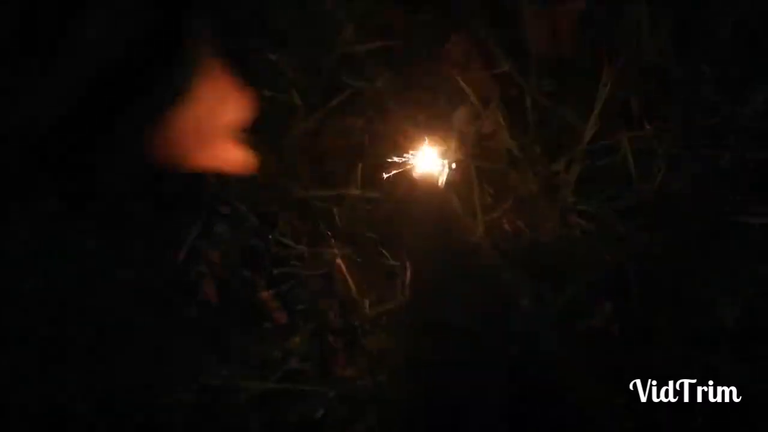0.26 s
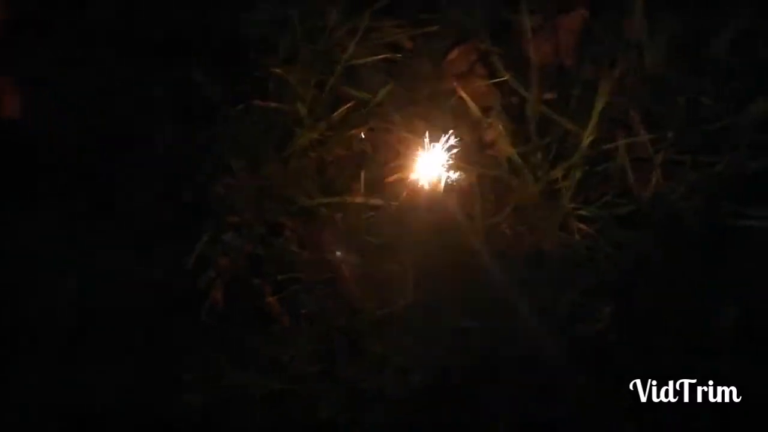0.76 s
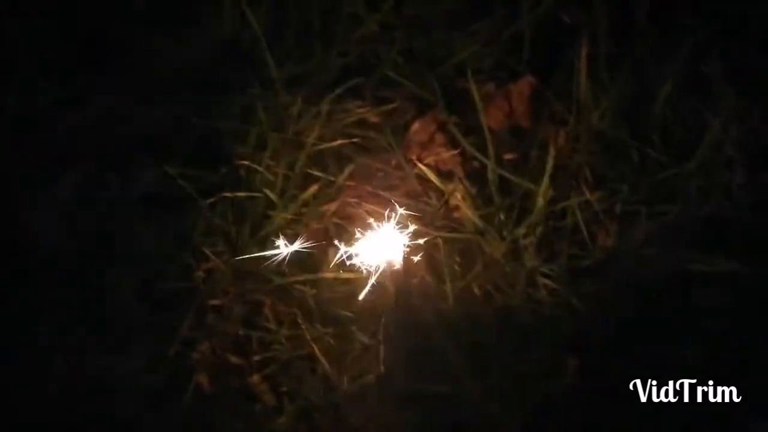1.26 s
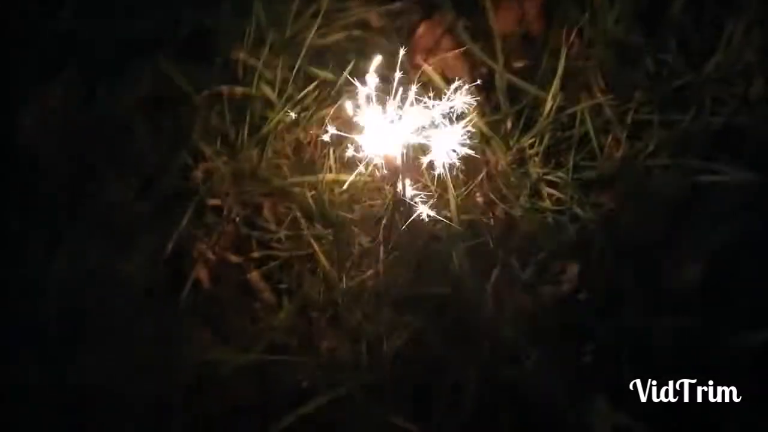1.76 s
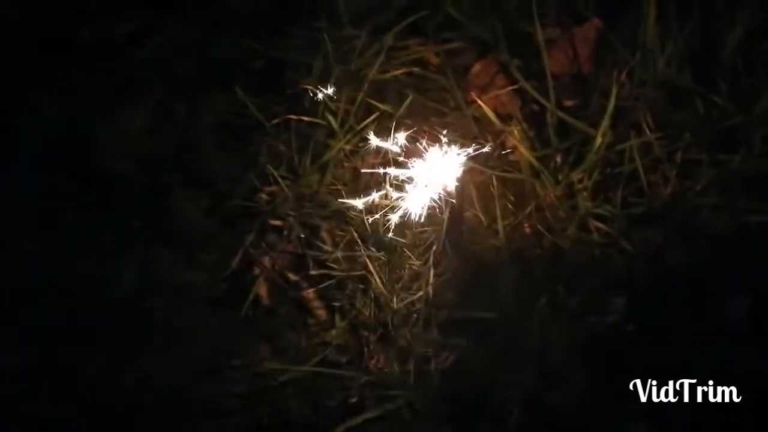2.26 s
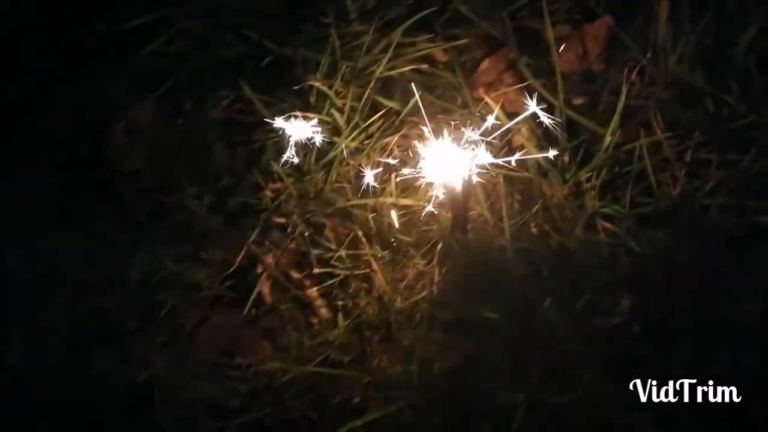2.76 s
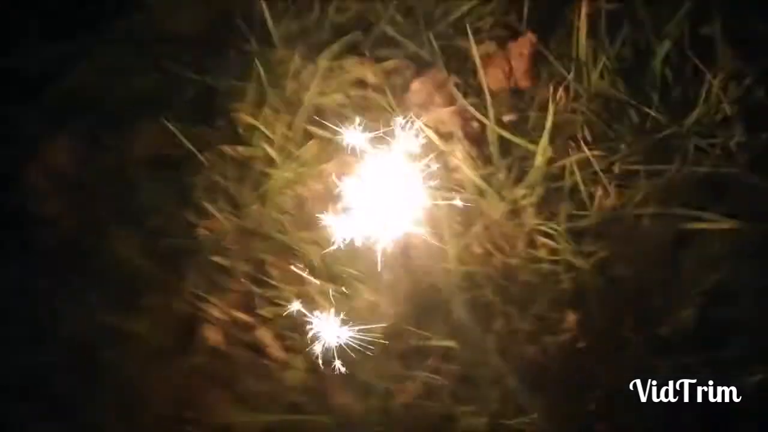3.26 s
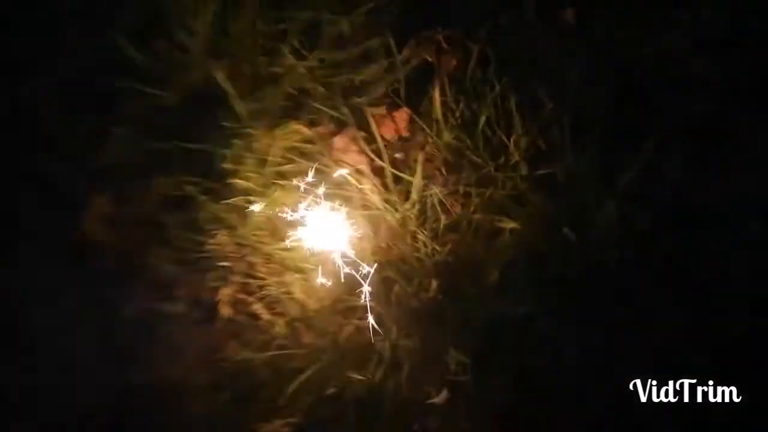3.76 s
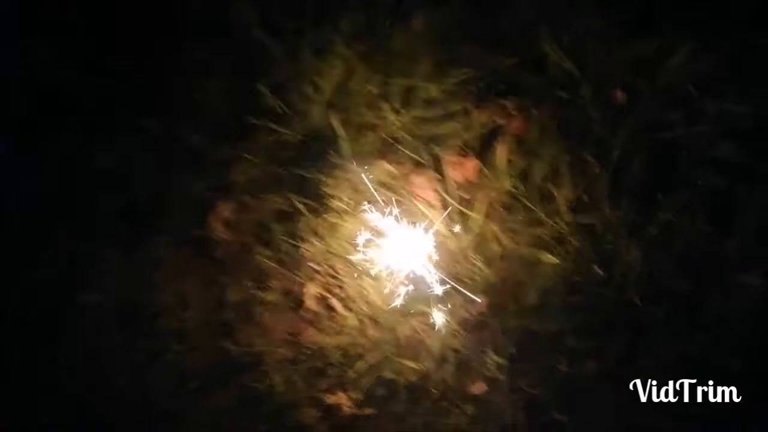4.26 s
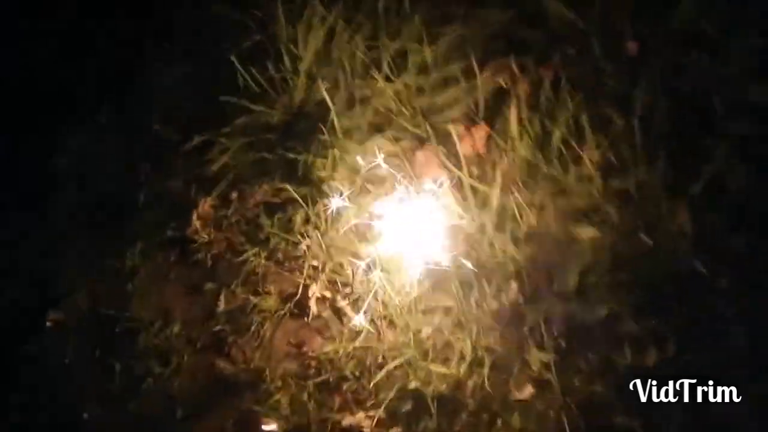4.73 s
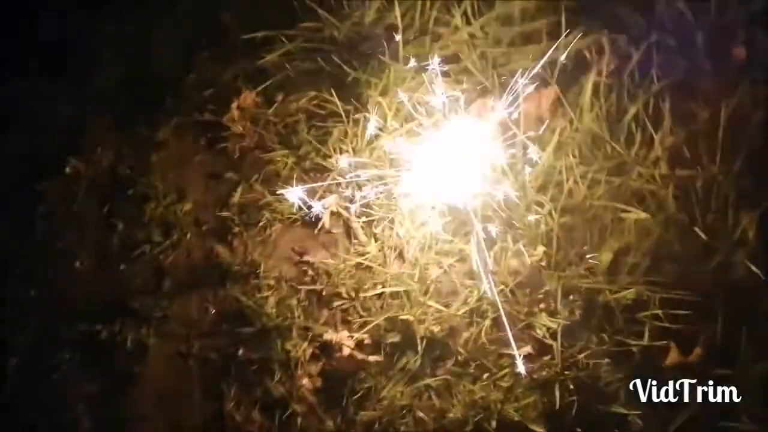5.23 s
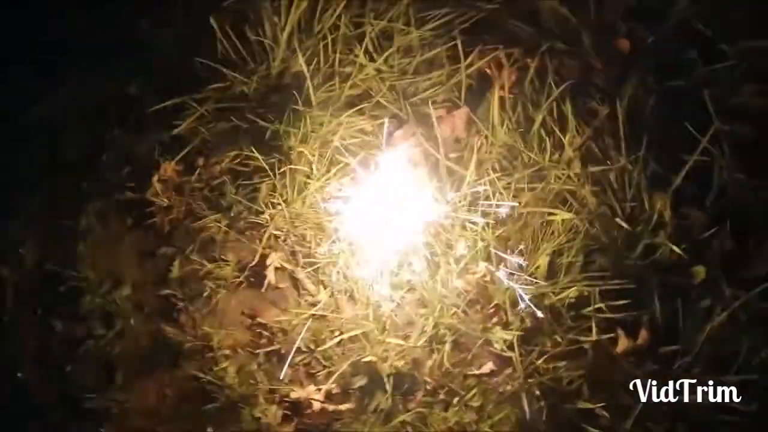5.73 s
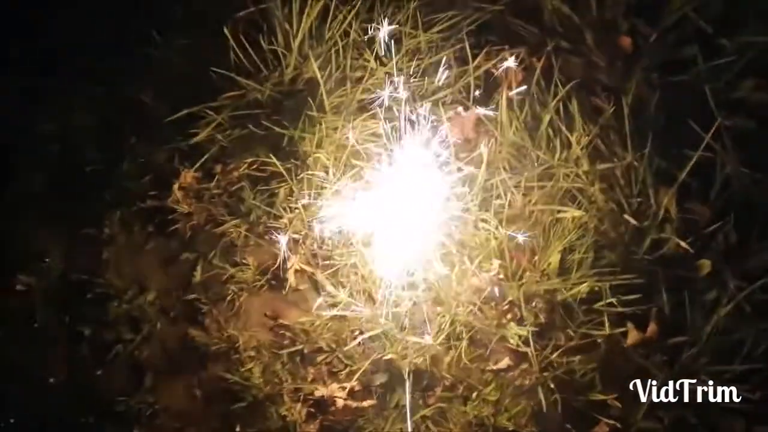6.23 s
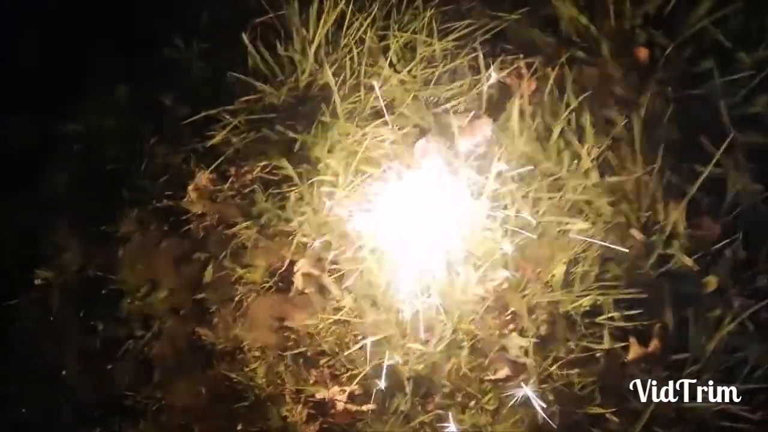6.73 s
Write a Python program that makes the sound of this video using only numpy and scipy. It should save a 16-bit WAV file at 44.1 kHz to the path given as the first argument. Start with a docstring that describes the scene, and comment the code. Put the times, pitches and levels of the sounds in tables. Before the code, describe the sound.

A bundle of sparklers fizzes with a bright, flickering hiss and sharp spark pops outdoors at night, while a brief sleeve swish passes over faint traffic rumble.

```python
"""A bundle of sparklers burns in the grass at night, close to a hand-held phone with two microphones.
From the start the burning coat hisses (flickering filtered noise) over a far traffic rumble (low noise).
Soon sparks begin to pop (filtered clicks with an echo), then a sleeve swishes away on the left (soft noise).
A few dull bumps follow (short low sines), and later jets of gas rush (noise around one pitch)."""
import sys
import numpy as np
from scipy import signal
from scipy.io import wavfile
from scipy.ndimage import uniform_filter1d

SR = 44100
rng = np.random.default_rng(int(sys.argv[2]) if len(sys.argv) > 2 else 0)


def wav_record(signal):
    """Record a signal, one row per channel, as 16-bit PCM in the file named by sys.argv[1]."""
    frames = np.transpose(np.atleast_2d(signal))
    bounded = np.clip(frames, -1, 1)
    # unit amplitude maps onto the largest positive 16-bit level
    quanta = np.round(bounded * 32767).astype(np.int16)
    wavfile.write(sys.argv[1], SR, quanta)


N = 308347  # length in samples


def gain_of(db):
    """Amplitude factor for a level in dB."""
    return 10 ** (np.asarray(db) / 20)


def evened(x):
    """Scale to rms 1."""
    return x / np.sqrt(np.mean(x ** 2) + 1e-20)


def read_curve(points, hz):
    """Read a frequency curve, straight between its points on a log frequency axis."""
    point_hz, value = np.transpose(points)
    return np.interp(np.log(hz + 1), np.log(point_hz + 1), value)


def follow(rows, t):
    """Ride every column of a table along its time column."""
    time_s, *columns = np.transpose(rows)
    return [np.interp(t, time_s, column) for column in columns]


def humps(rows, t):
    """Sum of rounded rises and falls in dB."""
    return sum(db * np.exp(-2 * ((t - peak_s) / half_s) ** 2) for peak_s, db, half_s in rows)


def grid(size):
    """Bin frequencies in Hz as a column and frame times in s as a row."""
    hz = np.fft.rfftfreq(size, 1 / SR)
    frame_s = np.arange(4 * N // size + 5) * size / 4 / SR
    return hz[:, None], frame_s[None]


def drift(shape, bins, frames):
    """Random patches of rms 1, smooth over some bins and frames."""
    x = rng.standard_normal(shape[::-1]).T
    smooth_in_pitch = uniform_filter1d(x, bins, 0)
    return evened(uniform_filter1d(smooth_in_pitch, frames, 1))


def noise_pair(size, left, right, same, lead_s, field_db):
    """Noise from random short-time spectra: partly alike in both microphones, later in the right by lead_s."""
    hz, t = grid(size)
    a, b, c, d = rng.standard_normal((t.size, hz.size, 4)).T
    likeness = np.clip(read_curve(same, hz), -1, 1)
    first = a + 1j * b
    shared = likeness * first * np.exp(-2j * np.pi * hz * lead_s)
    second = shared + np.sqrt(1 - likeness ** 2) * (c + 1j * d)
    spectra = np.array([first * gain_of(read_curve(left, hz)), second * gain_of(read_curve(right, hz))])
    # before the field moves the level, the mid of the pair sets the reference: rms 1
    plain_mid = signal.istft(spectra.mean(0), nperseg=size, noverlap=3 * size // 4)[1]
    pair = signal.istft(spectra * gain_of(field_db), nperseg=size, noverlap=3 * size // 4)[1]
    return pair[:, :N] / plain_mid.std()


def sputter(per_s, spread_db, decay_s):
    """Sudden flares that die away exponentially: a gain, never under 1."""
    lift = gain_of(spread_db * np.minimum(rng.exponential(1, N), 2.4))
    strikes = lift * (rng.random(N) < per_s / SR)
    decay = np.exp(-np.arange(2000) / SR / decay_s)
    return 1 + signal.oaconvolve(strikes, decay)[:N]


# strength of the fire: [t/s, level/dB]
FIRE_STRENGTH = [(0, -50.5), (.11, -47.5), (.27, -54), (.42, -46.5), (.68, -47.5), (1.42, -49.5),
                 (1.63, -51), (1.82, -49.5), (1.88, -56), (1.93, -51), (2.25, -50), (2.56, -55),
                 (2.74, -49.5), (3.1, -48.5), (3.3, -46), (3.61, -46.5), (3.91, -50.5), (4.2, -47),
                 (5.47, -46.5), (5.58, -51), (5.72, -46), (5.84, -49.5), (5.95, -45), (6.05, -49.5),
                 (6.2, -47), (7, -46)]
# brief flare-ups of the hiss: [peak t/s, lift level/dB, half length t/s]
FLARE_UPS = [(.332, 5.5, 0.041), (1.722, 4, 0.098), (2.139, 2, 0.026), (2.306, 3.5, .035),
             (2.476, 3.5, 0.025), (2.92, 2, 0.089), (3.36, 3.5, 0.025), (4.704, 1, 0.042),
             (5.285, 3, 0.086), (6.141, 4, .07)]
# the flame's roar under the hiss: [t/s, level/dB]
ROAR_SWELL = [(.6, -3.5), (1.5, -0.5), (2.7, 3), (3.4, 0), (4.0, 2), (4.4, -1.5), (4.9, 3), (5.5, 3.5),
              (6.2, 3.5)]
# colour change, fading in as the fire spreads: [f/Hz, left level/dB, right level/dB]
SPREAD_COLOUR = [(730, -0.5, 0), (1620, 5, -4.5), (2300, 1, 1), (2750, 1.5, -3), (3700, 2, -8.5),
                 (4500, 2, -2), (5270, 1.5, 0.5), (6200, 0.5, -2.5), (8400, 3.5, -0.5), (11200, 2, 2),
                 (13800, 5, 2)]
# each microphone's view of the fire, ground echo dip and port resonance included: [f/Hz, level/dB per Hz]
LEFT_VIEW = [(300, -12), (700, -18), (1400, -10), (2000, -17), (3000, -14.5), (4000, -15), (5500, -13.5),
             (6600, -13), (8600, -7.5), (10000, -11), (11200, -17), (12600, -21.5), (15800, -27.5)]
RIGHT_VIEW = [(300, -12), (700, -18), (1400, -4.5), (2100, -8.5), (2900, -9), (3400, -3.5), (3800, 3),
              (4400, -10.5), (5500, -10.5), (6300, -3.5), (7700, 0.5), (9000, -7), (10700, -21.5),
              (11900, -16), (15800, -24)]
# how alike the fire sounds in both microphones: [f/Hz, likeness from 0 to 1]
FIRE_LIKENESS = [(300, 0.59), (700, 0.038), (1300, 1), (2000, 0.12), (3000, 0.64), (4500, 0.052),
                 (7500, 0.25), (9500, 0.033)]
FIRE_LEAD_S = .00005  # the left microphone hears the fire earlier
SPREAD_S = 7.1  # time the fire takes to spread over the bundle
PAN_START_DB, PAN_DB_PER_S = 1.5, -0.6  # left-right balance drifts as it spreads


def fire():
    """Hiss of burning metal powder: it throbs as a whole, drifts in patches and spits tiny sparks."""
    hz, t = grid(size=256)
    hiss_db = follow(FIRE_STRENGTH, t)[0] + humps(FLARE_UPS, t)
    slow_db = uniform_filter1d(hiss_db, 300, 1)
    roar_db, = follow(ROAR_SWELL, t)
    spread = t / SPREAD_S
    pan_db = PAN_START_DB + PAN_DB_PER_S * t
    low = 1 / (1 + (hz / 2800) ** 2)  # the flame's roar swells apart from the hiss
    top = 1 / (1 + (11000 / (hz + 1)) ** 6)
    # the roar and the far treble, which come from the whole fire, throb less than the hiss
    steady = np.clip(0.25 * low + 0.17 * top, 0, 1)
    throb_db = hiss_db - slow_db + 0.87 * drift((1, t.size), bins=1, frames=6)
    mean_db = slow_db + low * roar_db
    throb_depth = (.7, 1.)  # the left microphone faces away and hears a more blended fire
    field_db = []
    for k in range(2):
        patches_db = 1.82 * drift((hz.size, t.size), bins=5, frames=22)
        colour_db = read_curve([(row[0], row[1 + k]) for row in SPREAD_COLOUR], hz)
        moving_db = throb_depth[k] * (1 - steady) * throb_db + patches_db
        field_db.append(mean_db + moving_db + pan_db * (.5 - k) + spread * colour_db)
    hiss = noise_pair(256, LEFT_VIEW, RIGHT_VIEW, FIRE_LIKENESS, FIRE_LEAD_S, np.array(field_db))
    sparks = sputter(per_s=300., spread_db=0.0, decay_s=0.00038)
    # rarer spurts that start sharply and die away
    puffs = sputter(per_s=14., spread_db=2.0, decay_s=0.015) ** 0.38
    spitting = sparks * puffs
    return hiss * np.array([evened(spitting ** 0.81), evened(spitting)])


# tone of the rumble: [f/Hz, level/dB per Hz]
TRAFFIC_TONE = [(12, -28), (20, -9), (59, -0.5), (119, 0), (133, -1), (156, -9.5), (205, -3.5), (268, -12),
                (305, -4.5), (363, -17), (468, -15.5), (644, -18), (900, -17.5), (1170, -25), (1980, -120)]
# how alike the rumble is in both microphones: [f/Hz, likeness, held within -1 and 1 when played]
TRAFFIC_LIKENESS = [(60, 1), (150, 0.95), (250, 1), (350, -0.07), (550, -2), (900, -0.33)]
# swell of the rumble: [t/s, level/dB]
RUMBLE_SWELL = [(0, -55), (.88, -53.5), (2.0, -56), (3.05, -54.5), (3.2, -53.5), (3.93, -57), (4.9, -53.5),
                (6.2, -55), (7, -54.5)]
# the deepest part surges: [peak t/s, lift level/dB, half length t/s]
SURGES = [(3.45, 5, .4), (3.95, 4, 0.63), (5.6, 1.5, 0.43)]
DEEP_DB = -2.5  # trim of the deepest part, under the surges


def traffic():
    """Low far rumble: noise that swells slowly, its deepest part surging apart."""
    hz, t = grid(size=2048)
    level_db, = follow(RUMBLE_SWELL, t)
    deep_db = DEEP_DB + humps(SURGES, t)
    deep_part = 1 / (1 + (hz / 75) ** 4)
    patches_db = 1.2 * drift((hz.size, t.size), bins=6, frames=6)
    swell_db = level_db + deep_db * deep_part + patches_db
    return noise_pair(2048, TRAFFIC_TONE, TRAFFIC_TONE, TRAFFIC_LIKENESS, 0, swell_db)


def causal(db):
    """Minimum-phase response, sharp at its start, for a gain in dB given on a half circle."""
    log_gain = np.log(gain_of(np.concatenate([db, db[-2:0:-1]])))
    phase = -signal.hilbert(log_gain).imag
    return np.fft.ifft(np.exp(log_gain + 1j * phase)).real[:512]


# sparks that burst: [t/s, click level/dB, left-right level/dB, weight under 3 kHz level/dB]
SPARK_POPS = [(0.323, -28, -6, -3), (0.3353, -31, 1, -5), (0.42, -31, -3, -5), (0.983, -18, -2, 5),
              (1.5986, -30, -9, -9), (1.701, -29.5, -11, -9), (1.7638, -23.5, -7, -3), (1.774, -30, -9, -9),
              (1.8063, -24.5, -6, -1.5), (1.8145, -25.5, -10, 0), (1.825, -27.5, -12, -3),
              (2.0365, -22, -7, -3), (2.3042, -30.5, -14, -3), (2.3636, -30.5, -8, 3),
              (2.4100, -25.5, -9, -6), (2.415, -32, 2, -6), (2.7693, -28, -6, 0), (2.9675, -31, -17, 4),
              (3.3627, -24, 11, 1.5), (4.237, -36, -10.5, -1), (5.0117, -29, -9, -3), (5.027, -30, -10, -6),
              (5.0958, -30, -10, 0), (5.293, -28, -14, -4), (5.526, -32, -11, -8), (5.728, -36, -7, -5),
              (6.122, -31, -13, -3), (6.1363, -28, -7, -5), (6.314, -29, 8, -6), (6.649, -33, 3, 4),
              (6.962, -29, 1, -9)]


def pops():
    """Each burst is a push and pull of air, its echo off the ground and a short scatter from the grass."""
    hz, t = np.fft.rfftfreq(1024, 1 / SR), np.arange(1200) / SR
    out = np.zeros((2, N + 2000))
    scatter = rng.standard_normal((len(SPARK_POPS), 2, 1200))
    for (start_s, db, pan_db, weight_db), noise in zip(SPARK_POPS, scatter):
        blow = .15 * noise * gain_of(-60 * t / .016)  # scatter falls 60 dB in 16 ms
        blow[:, 0] = 1
        blow[:, round(.00072 * SR)] += .55  # ground echo
        low_db = weight_db / (1 + (hz / 3000) ** 2)
        top_db = -0.67 / (1 + (10000 / (hz + 1)) ** 6)
        for k, view in enumerate((LEFT_VIEW, RIGHT_VIEW)):
            response = causal(read_curve(view, hz) + low_db + top_db)
            click = np.convolve(response, [1, .3, -.4])  # push, then pull
            sound = np.convolve(blow[k], click / abs(click).max())
            at = round(start_s * SR)
            out[k, at:at + len(sound)] += gain_of(db + pan_db * (.5 - k)) * sound
    return out[:, :N]


# a sleeve swishing away on the left: [t/s, level/dB]
SLEEVE_SWISH = [(.64, -78), (.68, -62), (.726, -45.5), (.807, -43), (.84, -37.5), (.91, -41), (1.025, -40),
                (1.104, -33.5), (1.204, -41), (1.364, -49), (1.42, -58.5), (1.465, -72)]
# extra body near 2 kHz: [t/s, level/dB]
SLEEVE_BODY = [(.73, -6), (.84, -3.5), (.97, -1.5), (1.19, 2), (1.36, -2)]
# each microphone's view of the sleeve: [f/Hz, level/dB per Hz]
LEFT_SLEEVE = [(700, -19), (1200, -4), (2000, -2.5), (3800, -3.5), (5500, -3), (7000, -2), (9000, 5),
               (11000, -7), (13000, -12.5), (15800, -16)]
RIGHT_SLEEVE = [(700, -24.5), (1200, -5.5), (2000, -2.5), (3800, -4), (5000, -11), (6500, -4.5),
                (8000, 1.5), (9500, -11), (10800, -12), (13000, -17), (15800, -34)]
# how alike the sleeve sounds in both microphones: [f/Hz, likeness from 0 to 1]
SLEEVE_LIKENESS = [(700, 1), (1200, 0.37), (2000, .7), (3000, 0.38), (5500, 0.054), (7000, 0.14),
                   (8800, 0.52), (10500, .1)]
SLEEVE_LEAD_S = 0.00052  # the left microphone hears the sleeve earlier


def rustle():
    """Smooth friction of cloth, in soft clumps; its body grows late in the stroke."""
    hz, t = grid(size=256)
    level_db, = follow(SLEEVE_SWISH, t)
    body_db, = follow(SLEEVE_BODY, t)
    body = np.exp(-(np.log2((hz + 1) / 2000) / 0.27) ** 2)
    clumps_db = 1.0 * drift((1, t.size), bins=1, frames=10)
    patches_db = 0.94 * drift((hz.size, t.size), bins=6, frames=14)
    field_db = level_db + body * body_db + clumps_db + patches_db
    return noise_pair(256, LEFT_SLEEVE, RIGHT_SLEEVE, SLEEVE_LIKENESS, SLEEVE_LEAD_S, field_db)


# dull low bumps, as of a hand shifting on the phone: [start t/s, level/dB, pitch f/Hz]
LOW_BUMPS = [(1.778, -42.5, 62.4), (3.193, -44, 62), (3.333, -45, 75), (3.430, -44, 102), (4.595, -44, 75)]
BUMP_CYCLES = 2.2


def bumps():
    """Each bump is about two cycles of low pressure under a smooth arch, the same in both microphones."""
    out = np.zeros(N)
    for start_s, db, pitch_hz in LOW_BUMPS:
        turns = np.arange(0, BUMP_CYCLES, pitch_hz / SR)
        at = round(start_s * SR)
        wave = np.hanning(len(turns)) * np.sin(2 * np.pi * turns)
        out[at:at + len(turns)] += gain_of(db) * wave
    return out


# jets of gas when a new stick catches, level before each side's gain:
# [peak t/s, level/dB, centre f/Hz, rise t/s, fall t/s]
GAS_JETS = [(4.038, -51.5, 2680, 0.035, 0.055), (4.212, -55, 3000, 0.03, 0.078),
            (4.688, -46.5, 2890, 0.19, 0.096), (5.285, -44.5, 3030, 0.045, 0.076)]
JET_EDGE_DB = -12  # level at the start and the end of a jet, relative to its peak


def jets():
    """A rush of gas around one pitch: narrow on the right, spread wide on the left."""
    hz, t = grid(size=256)
    path, on = [], 0
    for peak_s, db, pitch_hz, rise_s, fall_s in GAS_JETS:
        start_s, end_s, edge_db = peak_s - rise_s, peak_s + fall_s, db + JET_EDGE_DB
        path += [(start_s, edge_db, pitch_hz), (peak_s, db, pitch_hz), (end_s, edge_db, pitch_hz)]
        on = on + ((t > start_s) & (t < end_s))
    level_db, centre_hz = follow(path, t)
    octaves = np.log2((hz + 1) / centre_hz)
    left_db = 10.7 + 10 * np.log10(np.exp(-(octaves / 0.71) ** 2) + 0.14)
    right_db = 11.3 + 10 * np.log10(np.exp(-(octaves / 0.18) ** 2) + 0.023)
    mute_db = -100 * (1 - on)  # between jets
    patches_db = 3.1 * drift((hz.size, t.size), bins=3, frames=10)
    field_db = np.array([left_db, right_db]) + level_db + mute_db + patches_db
    return noise_pair(256, LEFT_VIEW, RIGHT_VIEW, FIRE_LIKENESS, FIRE_LEAD_S, field_db)


def scene():
    """All layers summed, left and right."""
    return fire() + traffic() + pops() + rustle() + bumps() + jets()


EDGE_HZ = 15900  # top of the band


def record(dry):
    """The band limit: a steep low-pass that delays nothing."""
    low_pass = signal.firwin(801, EDGE_HZ, window=("kaiser", 9), fs=SR)
    return signal.oaconvolve(dry, low_pass[None], "same")


dry = scene()
out = record(dry)
wav_record(out)
```